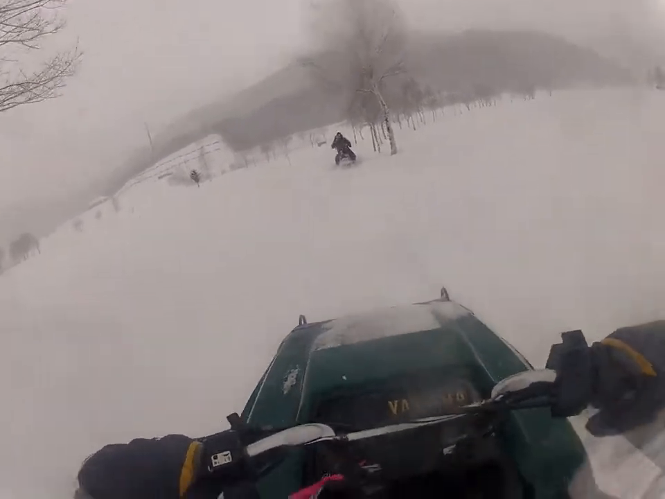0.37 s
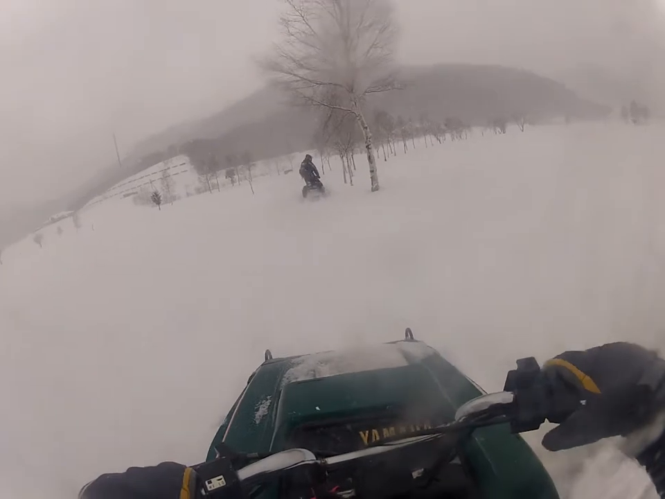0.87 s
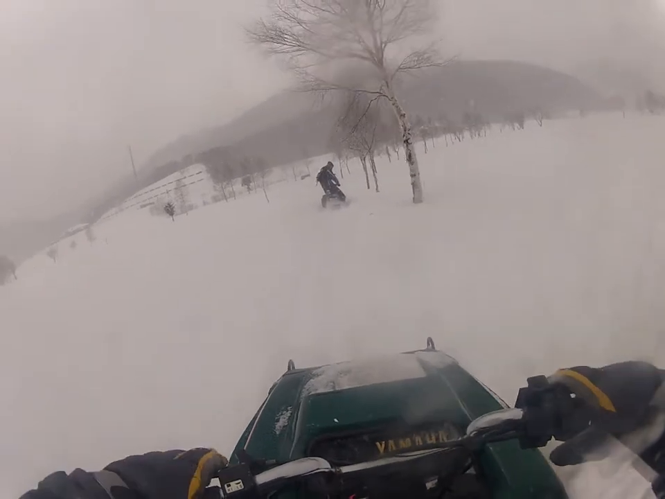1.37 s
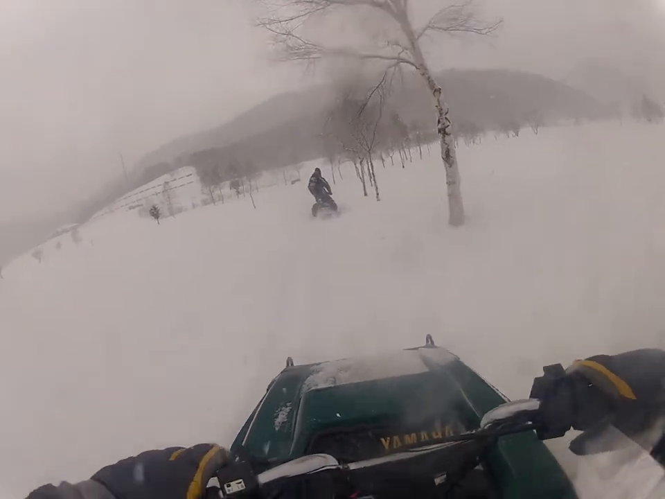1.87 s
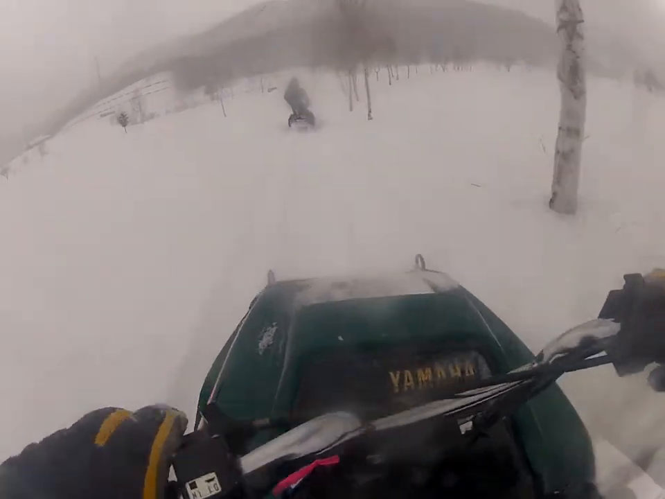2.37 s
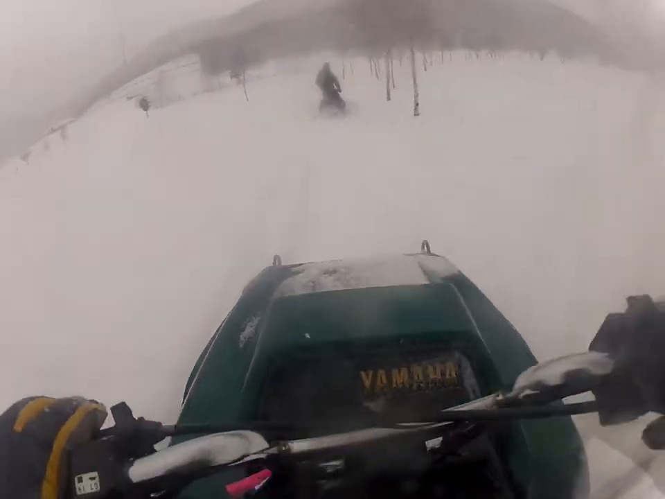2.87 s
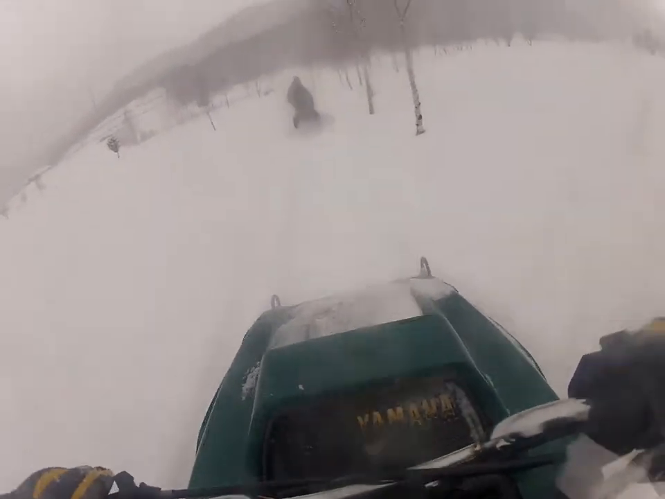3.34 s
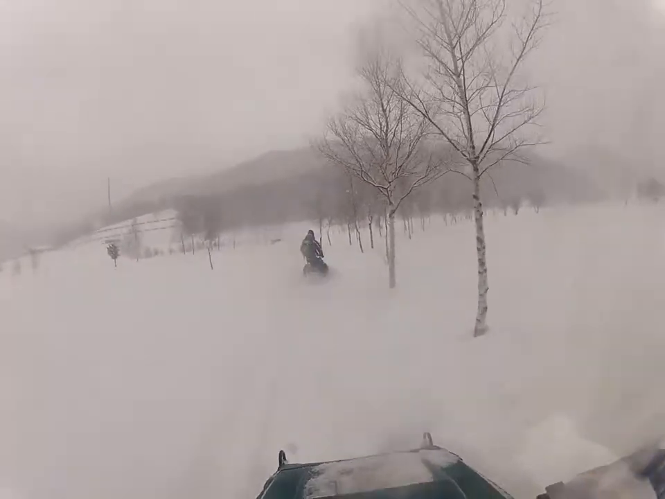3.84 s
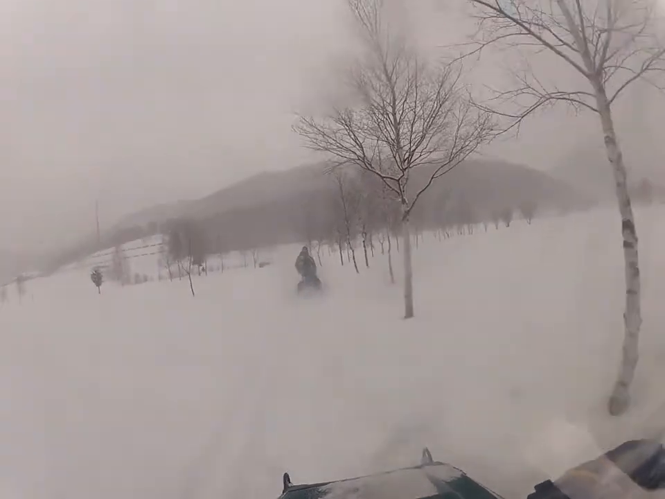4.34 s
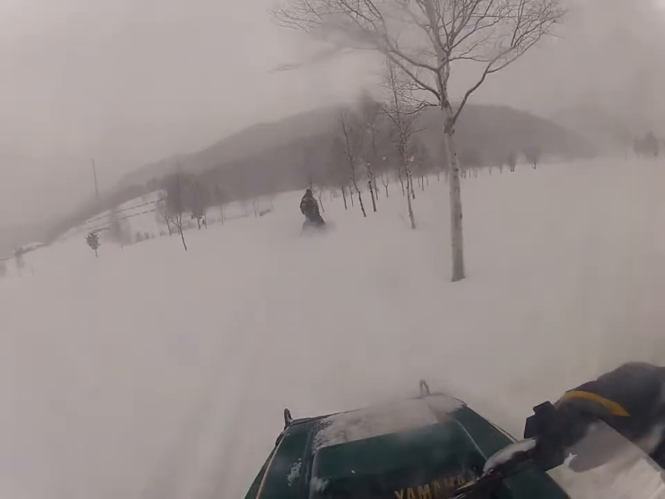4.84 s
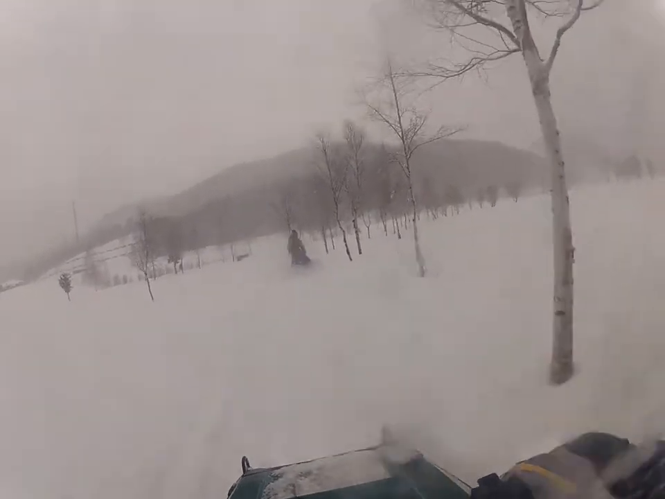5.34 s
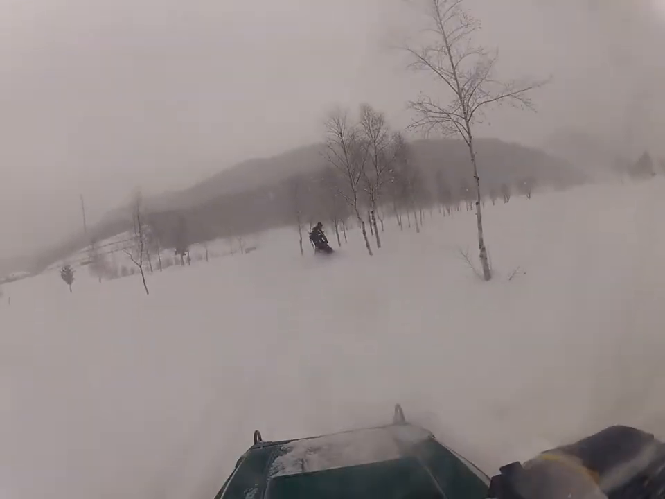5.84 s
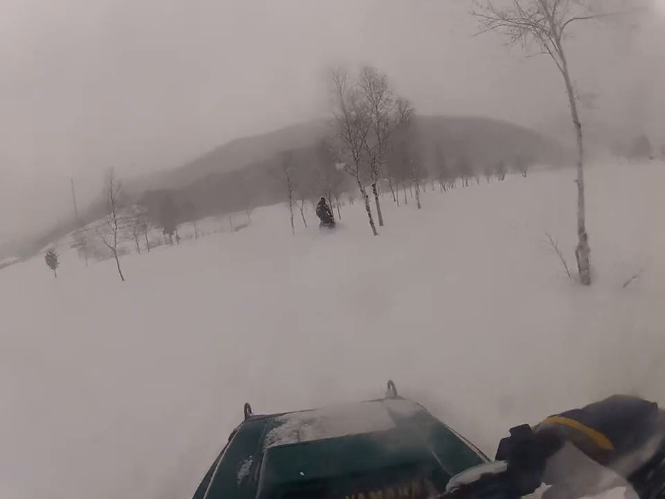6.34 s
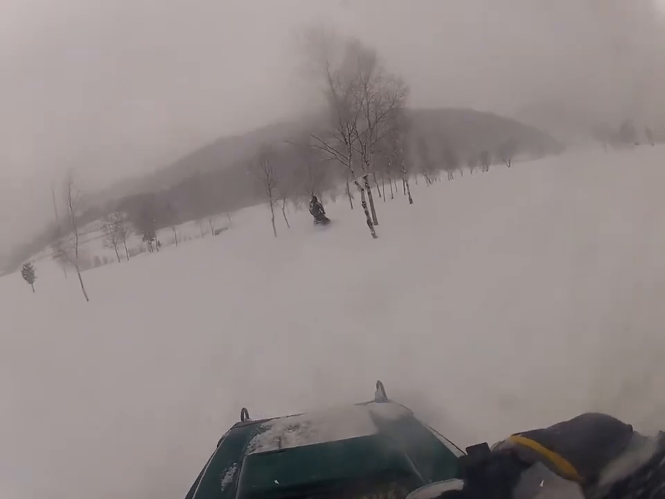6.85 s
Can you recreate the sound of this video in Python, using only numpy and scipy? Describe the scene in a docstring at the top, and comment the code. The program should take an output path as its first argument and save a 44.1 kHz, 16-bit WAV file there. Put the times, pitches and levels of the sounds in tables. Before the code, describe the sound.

Raspy snowmobile drone close up outdoors, slowly falling in pitch, stumbling as throttle eases, then pulling hard again with metallic rattle and brief ski scrape.

```python
"""Snowmobile from the rider's seat

Two-stroke exhaust: cosines on the shaft orders over gas noise; listed firings come weak, weakest at low load.
Gear whine and shaped noise of intake, belt and track ring in the small camera housing, all on one crank.
Around them: low lumpy rumble, handlebar knocks, ski scrapes and a narrow ring that swells at the end.
The camera samples slowly and holds each sample, which mirrors the sound into the treble."""
import sys
import numpy as np
from scipy import signal
from scipy.fft import rfft, irfft, next_fast_len
from scipy.io import wavfile
from scipy.ndimage import map_coordinates

SR = 44100
rng = np.random.default_rng(int(sys.argv[2]) if len(sys.argv) > 2 else 0)


def invert_db(level):
    """Linear amplitude ratio for a level in decibels (20 dB per decade), elementwise."""
    return 10 ** (np.asarray(level, dtype=float) / 20)


def dump(signal):
    """Clip the signal to [-1, 1] and save it as 16-bit WAV at the path in sys.argv[1]."""
    limited = np.clip(np.atleast_2d(signal).T, -1, 1)
    pcm = np.round(limited * 32767).astype(np.int16)
    wavfile.write(sys.argv[1], SR, pcm)


N = 317961
t = np.arange(N) / SR
CRUISE_HZ = 57  # crank speed at which the speed-dependent terms are zero

# the ride: t/s, crank speed/Hz, engine load/0-1, rider leaning over engine/0-1, rattle/dB (before band share)
RIDE = [(0, 63.8, 0.62, 0, 0.5), (.3, 64.2, 0.7, 0, 1.5), (.64, 63.36, 0.74, 0, 0.5),
        (.92, 64.24, 0.68, 0, 2.5), (1.02, 63.25, 0.65, 0.2, 0), (1.24, 60, 0.6, 0.34, -0.5),
        (1.57, 58.68, 0.55, 0.25, 0), (1.89, 56.77, 0.4, 0.5, -1), (2.17, 55.2, 0.69, 0.73, 0),
        (2.41, 54.43, 0.6, .9, -1.5), (2.7, 54.8, 0.86, 0.74, -1.5), (2.87, 53.53, 0.63, 0.99, -.5),
        (3.27, 53.43, .7, 0.88, 0.5), (3.55, 52.75, .65, 0.74, 0), (3.82, 53.35, 0.21, 0.48, 1.5),
        (4.16, 51.86, 0.2, 0.53, 0.5), (4.5, 50.73, 0.24, 0.3, -2), (4.62, 52.08, .85, 0, 0),
        (4.82, 54.5, 0.85, 0.01, -0.5), (5.4, 54.8, 0.79, 0, -1.5), (5.6, 54.9, .8, 0, 0),
        (6.02, 54.82, 0.97, 0.3, 0.5), (6.41, 56.96, 0.94, 0.01, 1), (6.8, 58.8, .95, 0.01, 1.5),
        (7.21, 59.96, 0.88, 0, 4)]
# ragged running: t/s, firing size scatter/dB, rumble level/dB (before trim)
RAGGED = [(0, 1, -41), (1.1, 1, -33.5), (1.3, 2.5, -36), (1.7, 0.5, -37), (2.3, 1.2, -37),
          (2.55, 0.9, -32.5), (3.4, 0.6, -38), (3.7, 1, -37.5), (4.5, 2, -37), (4.62, 0.9, -42),
          (6.2, -0.36, -40), (7.21, -0.6, -47)]


def curves(rows):
    """One interpolated curve over t for each column after the time."""
    s, *cols = np.transpose(rows)
    return [np.interp(t, s, c) for c in cols]


def unit(x):
    """Scale to rms 1."""
    return x / np.sqrt(np.mean(x ** 2) + 1e-20)


def wobble(count):
    """Smooth random curve with one knot per unit of a running count."""
    return map_coordinates(rng.standard_normal(int(count[-1]) + 4), [count])


def filtered(x, response):
    """x times a response of frequency."""
    m = next_fast_len(N + SR // 2)
    return irfft(rfft(x, m) * response(np.fft.rfftfreq(m, 1 / SR)), m)[:N]


def coloured(x, table):
    """x shaped by (f/Hz, gain/dB) points on a log axis, -120 dB outside them."""
    hz, db = np.transpose(table)
    return filtered(x, lambda f: invert_db(np.interp(np.log(f + 1), np.log(hz), db, -120, -120)))


def resonance(table, f):
    """Gain at f of resonances (f/Hz, width/Hz, level/dB), summed in power."""
    return np.sqrt(sum(invert_db(2 * db) / (1 + (2 * (f - c) / w) ** 2) for c, w, db in table))


def pulses(events, width=1):
    """Sum of Gaussian dB humps (t/s, height/dB, length/s); 1/e half-width is width times length."""
    return sum(db * np.exp(-((t - s) / (width * length)) ** 2) for s, db, length in events)


def rumble():
    """Low lumpy rumble, strongest near 110 Hz, likely from uneven firing: low noise of wandering level."""
    # rumble colour: f/Hz, relative density/dB
    colour = [(12, -28), (35, -14), (78, -10), (110, 0), (135, -5), (200, -16), (400, -50)]
    level_db = curves(RAGGED)[1] - 5.0 + 1.1 * wobble(t * 6)
    return invert_db(level_db) * unit(coloured(rng.standard_normal(N), colour))


def bumps():
    """Chassis bumps on the snow: short knocks through the handlebar, decaying sines with a soft onset."""
    # knocks: t/s, level of decay at its start/dB, f/Hz, t60/s
    knocks = [(2.58, -36, 40, .25), (2.595, -29, 2280, .04), (3.7, -24, 530, .055), (4.17, -36, 48, .35),
              (4.93, -35, 50, .25), (5.47, -38, 40, .25), (5.49, -32, 600, .05), (5.62, -36, 40, .25)]
    out = np.zeros(N + SR)
    u = t[:SR // 4]
    for s, db, hz, t60 in knocks:
        envelope = invert_db(db - 60 * u / t60) * (1 - np.exp(-u * hz / 2))
        out[round(s * SR):][:len(u)] += envelope * np.sin(2 * np.pi * hz * u)
    return out[:N]


def scrapes():
    """Skis scrape crusty snow: gritty noise bursts that start sharply and fade."""
    # scrapes: t/s, starting level/dB, t60/s
    strokes = [(3.55, -67, 2.5), (5.49, -42.5, 1.1), (5.6, -50, 0.48)]
    # scrape colour: f/Hz, relative density/dB
    crust = [(2600, -30), (2800, 3), (3100, -13), (3400, 6), (3650, -22), (4000, -40)]
    envelope = sum((t > s) * invert_db(db - 60 * np.abs(t - s) / t60) for s, db, t60 in strokes)
    grit = invert_db(2.74 * wobble(t * 120)) * rng.standard_normal(N)
    return envelope * unit(coloured(grit, crust))


def swell(turns):
    """A narrow ring of noise, pulsing once a turn, grows to the end."""
    # ring colour: f/Hz, relative density/dB
    colour = [(2100, -30), (2200, -1), (2270, -1), (2330, -10), (2420, -30)]
    start_s, rise_db_per_s, end_db = 6.9, 33, -35
    hiss = (1 + .5 * np.cos(2 * np.pi * turns)) * rng.standard_normal(N)
    envelope = (t > start_s) * invert_db(end_db + rise_db_per_s * (t - t[-1]))
    return envelope * unit(coloured(hiss, colour))


def clatter(turns):
    """Intake, belt and track noise pulses with the crank; each housing band rattles partly on its own."""
    # bands, low to high: level/dB, rise/dB per Hz of crank speed, share of rattle/1, rise at full lean/dB
    bands = [(-39.5, 0.15, 0.42, 1.5), (-41, 0.46, 0.72, 1.5), (-40.5, 0.04, 0.95, 0.2),
             (-44, 0.11, 0.71, -0.05)]
    # jolts that briefly raise all bands: t/s, rise/dB, 1/e half-width/s
    jolts = [(2.593, 5, 0.021), (3.103, 1, 0.032), (4.614, 0.5, 0.034)]
    # lowest ring, lower rasp, higher rasp, fizz of the upper modes: f/Hz, relative density/dB
    housing = [(300, -15), (500, -13.5), (800, -12), (1010, -21.5), (1130, -8), (1230, 2), (1300, -1),
               (1380, -6), (1460, -21.5), (1540, -9), (1700, -9)]
    rasp = [(1350, -36), (1460, -26), (1560, -7.5), (1660, 3.5), (1850, 1), (1990, -1), (2200, -44)]
    grate = [(1800, -38), (1990, -6.5), (2080, 2), (2160, -4), (2250, 3.5), (2400, -9.5), (2520, -7),
             (2650, -3.5), (2800, -11), (3070, -14), (3400, -53)]
    upper = [(2800, -44), (3070, -19), (3350, -2.5), (3700, -2), (4000, -5), (4500, -11), (5100, -8.5),
             (6000, -10)]
    speed_hz, _, lean, rattle_db = curves(RIDE)
    beat = 1 + .08 * np.cos(2 * np.pi * turns) + .08 * np.cos(4 * np.pi * turns + 1)
    shared_db = 0.42 * wobble(t * 40) + 0.55 * wobble(t * 150) + pulses(jolts)
    # piston slap: a narrow pulse once a turn
    slap = np.exp(6000 * (np.cos(2 * np.pi * (turns + .002 * wobble(turns))) - 1))
    out = 0
    for (db, rise, share, lean_db), colour in zip(bands, (housing, rasp, grate, upper)):
        level_db = db + rise * (speed_hz - CRUISE_HZ) + share * rattle_db + lean_db * lean
        own_db = 0.55 * wobble(t * 25) + 0.65 * wobble(t * 3.49)
        hiss = beat * invert_db(shared_db + own_db) * rng.standard_normal(N)
        mix = unit(coloured(hiss, colour)) + 0.12 * unit(coloured(slap, colour))
        out = out + invert_db(level_db) * unit(mix)
    return out


def whine(turns):
    """Gear on the crank: a sine at tooth rate, loud where the housing rings."""
    teeth = 24
    phase = 2 * np.pi * teeth * turns + .4 * wobble(t * 25)
    tone = invert_db(.9 * wobble(t * 9)) * np.sin(phase)
    modes = [(1294, 85, 0.5), (1524, 18, -1.5)]  # f/Hz, width/Hz, level/dB; gain applied twice
    return invert_db(-38.5) * filtered(tone, lambda f: resonance(modes, f) ** 2)


def exhaust(turns):
    """Shaft orders over rushing gas; firing strength and instant wander from turn to turn."""
    # strong orders: order, rise from no to full load/dB, rise at full lean/dB
    strong_orders = [(1, 0, -7.5), (2, 7, 4.5), (3, 3.5, 4.5), (4, 5.5, 3.4), (5, 6.5, 1), (6, 9.5, -1.5)]
    # weak orders: order, level before muffler gain/dB
    weak_orders = [(7, -40), (8, -46), (9, -42.5), (10, -48.5), (11, -44), (12, -44), (13, -48.5),
                   (14, -53.5), (15, -53.5), (16, -47.5), (17, -50), (18, -45.5)]
    # weak firings: t/s, depth/dB, length/s (1/e half-width is 0.7 of it)
    misses = [(0.334, 2.3, 0.031), (1.057, 2.7, 0.02), (1.219, 2.5, 0.022), (1.329, 5.6, 0.027),
              (1.403, 4.0, 0.025), (1.539, 4.5, 0.03), (1.914, 2.3, 0.06), (2.222, 2.3, 0.027),
              (2.567, 2.6, 0.02), (3.031, 3.4, 0.047), (3.362, 2.7, 0.021), (3.598, 3.8, 0.06),
              (3.789, 2.4, 0.026), (3.872, 4.4, 0.031), (3.992, 2.8, 0.026), (4.057, 3.6, 0.04),
              (4.149, 11, 0.033), (4.226, 5.6, 0.02), (4.307, 3.4, 0.035), (4.359, 3.6, 0.024),
              (4.436, 10, 0.026), (4.517, 4.8, 0.023)]
    # tuned pipe on even orders (cylinders alike), no load or lean: f/Hz, level/dB
    pipe_even = [(100, -53.5), (119, -43.5), (128, -48.5), (204, -37), (235, -35), (256, -31.5),
                 (305, -42.5), (321, -40.5), (345, -41.5), (386, -43)]
    # the same on odd orders (cylinders differ): f/Hz, level/dB
    pipe_odd = [(50, -43), (65, -42), (152, -32.5), (165, -32.5), (192, -36), (253, -43.5), (265, -52),
                (274, -43.5), (288, -40), (300, -41.5), (321, -36.5)]
    # muffler resonances the weak orders glide through: f/Hz, width/Hz, level/dB
    muffler = [(508, 45, 0.5), (608, 34, -8.5), (749.4, 56, -3), (856, 32, -9)]
    # chambers, each delaying pitches by up to a cycle: f/Hz, width/Hz
    chambers = [(106, 33), (197, 22), (389, 150)]
    # gas rush colour: f/Hz, relative density/dB
    rush = [(20, -12), (100, -12), (200, -3), (350, 2), (500, -7.5), (900, -33.5), (1300, -80)]
    weak_load_db, weak_lean_db = 0.5, 1.5  # rise from half to full load; rise of orders 7-9 at full lean

    speed_hz, load, lean, _ = curves(RIDE)
    scatter_db = curves(RAGGED)[0]
    size_db = scatter_db * wobble(turns) - pulses(misses, .7)
    shake_turns = .004 * scatter_db * wobble(turns)

    orders = []
    for k, load_db, lean_db in strong_orders:
        pipe_hz, pipe_db = np.transpose(pipe_odd if k % 2 else pipe_even)
        level_db = np.interp(k * speed_hz, pipe_hz, pipe_db) + load_db * load + lean_db * lean
        orders.append((k, invert_db(level_db)))
    for k, db in weak_orders:
        level_db = db + weak_load_db * (2 * load - 1.5) + weak_lean_db * lean * (k < 10)
        orders.append((k, invert_db(level_db) * resonance(muffler, k * speed_hz)))

    tone = 0
    for k, gain in orders:
        hz = k * speed_hz
        lag_cycles = sum(np.arctan2(hz * w, c * c - hz * hz) / np.pi for c, w in chambers)
        # the long pipe smears the high orders through the turn
        lag_cycles = lag_cycles + .11 * max(k - 8, 0) ** 2
        # each order breathes; the weak ones come and go
        if k < 7:
            own_db = .6 * wobble(t * 10)
        else:
            own_db = 1.3 * wobble(t * 10) + 1.1 * wobble(t * 2.5)
        if k < 3:
            own_db = own_db + 2 * lean * wobble(t * 8)  # flutter near the engine
        phase = 2 * np.pi * (k * (turns + shake_turns) - lag_cycles)
        tone = tone + gain * invert_db(own_db) * np.sqrt(2) * np.cos(phase)

    gas_db = -45.5 + 2.4 * load + 0.065 * (speed_hz - CRUISE_HZ) + wobble(t * 3)
    gas = unit(coloured(rng.standard_normal(N), rush))
    return invert_db(size_db) * tone + invert_db(gas_db + size_db / 2) * gas


def scene():
    """Sum of all sources; the engine sources turn on one crank."""
    turns = np.cumsum(curves(RIDE)[0]) / SR
    surroundings = rumble() + bumps() + scrapes() + swell(turns)
    engine = clatter(turns) + whine(turns) + exhaust(turns)
    return (surroundings + engine)[None]


def band_limit(x):
    """A steep low-pass at the top of the band."""
    return signal.sosfilt(signal.butter(12, 15750, fs=SR, output="sos"), x)


def record(dry):
    """Low-pass under half the slow sample rate, sample, hold: mirror images either side of that rate."""
    hold_hz, end_hz = 12000, 15290
    # steep roll-off over a -22 dB leak, nothing above hold_hz / 2
    kept = filtered(dry[0], lambda f: (f < hold_hz / 2) * (invert_db(-22.0) + 1 / (1 + (f / 5450) ** 50)))
    # baseband and first image pair of the sampling pulses
    sampled = kept * (1 + 2 * np.cos(2 * np.pi * hold_hz * t))
    # each value repeated four times at 4 * hold_hz; treble ends at end_hz
    held = filtered(sampled, lambda f: np.sinc(f / hold_hz) / np.sinc(f / (4 * hold_hz)) * (f < end_hz))
    return band_limit(held[None])


dry = scene()
out = record(dry)
dump(out)
```